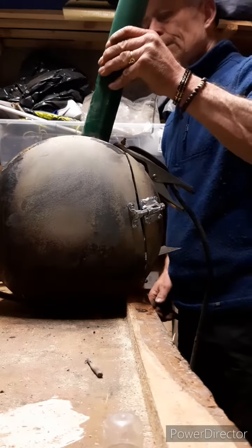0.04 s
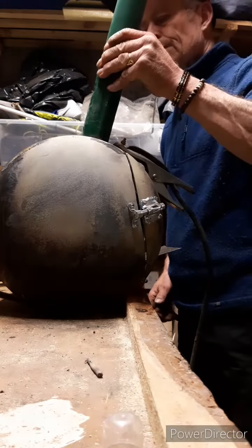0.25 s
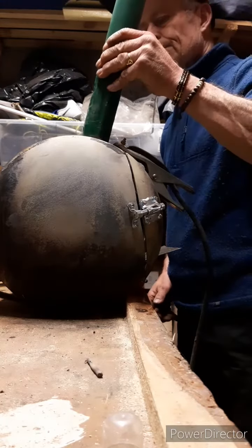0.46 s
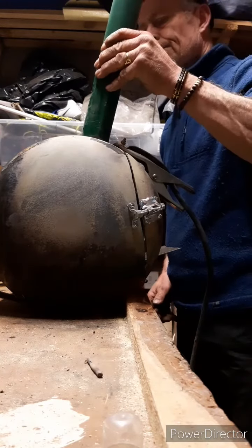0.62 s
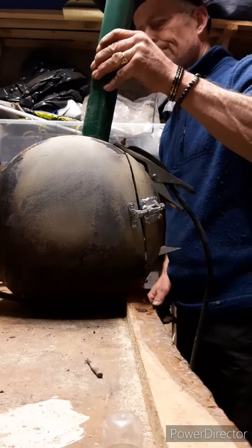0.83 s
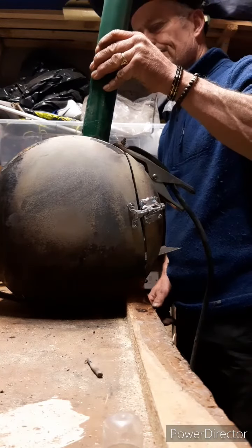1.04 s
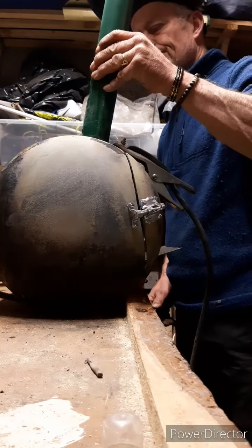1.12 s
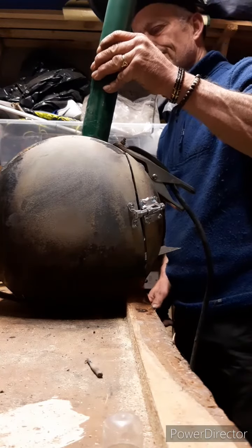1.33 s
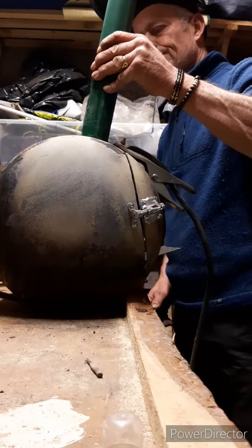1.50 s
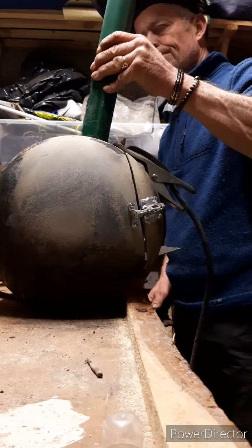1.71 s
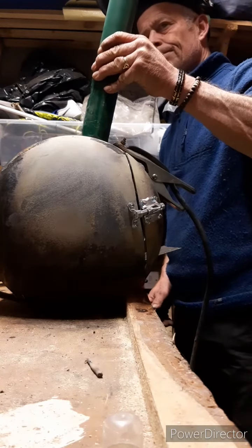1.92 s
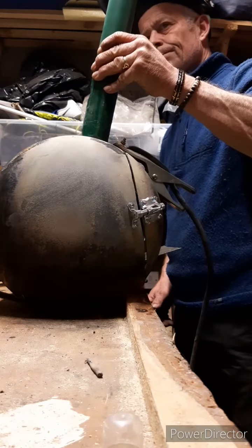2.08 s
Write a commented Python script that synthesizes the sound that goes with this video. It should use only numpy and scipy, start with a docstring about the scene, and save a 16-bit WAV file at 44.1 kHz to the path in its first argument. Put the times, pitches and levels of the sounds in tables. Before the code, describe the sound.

Dull thumps of a rocking gas bottle, then light scrapes and a sharp metal click.

```python
"""Steel tube against a gas bottle

A steel tube is shifted by hand against a large gas bottle lying on a wooden bench in a small workshop.
The bottle rocks: impacts excite its low modes and thud in the bench, and rolling adds a rumble.
Friction makes the tube hiss as it slides; where it catches, scrapes and clicks excite its high modes.
The room reverberates briefly over a low steady drone."""
import sys
import numpy as np
from scipy import signal
from scipy.fft import rfft, irfft
from scipy.io import wavfile

SR = 44100
rng = np.random.default_rng(int(sys.argv[2]) if len(sys.argv) > 2 else 0)


def unload_wav(signal):
    """Save mono or channel-first audio to the path in sys.argv[1] as 16-bit WAV at rate SR, clipped to [-1, 1]."""
    wavfile.write(
        sys.argv[1],
        SR,
        np.round(np.clip(np.atleast_2d(signal).T, -1, 1) * 32767).astype(np.int16),
    )


N = 94815


def amp(db):
    """Amplitude ratio of a level in decibels."""
    return 10 ** (np.asarray(db) / 20)


def curve_at(points, hz):
    """Interpolation on a logarithmic frequency axis."""
    frequency, value = np.transpose(points)
    return np.interp(np.log(hz + 1), np.log(frequency + 1), value)


def unit_rms(x):
    """Normalisation to unit mean power."""
    return x / np.sqrt(np.mean(x ** 2) + 1e-20)


def pan(db):
    """Direction by level difference: two channel gains, the left exceeding the right by db."""
    return amp([[db / 2], [-db / 2]])


def add(mix, start, sound):
    """Superposition: a sound joins the mix at a start time in seconds."""
    part = mix[..., max(round(start * SR), 0):][..., :sound.shape[-1]]
    part += sound[..., :part.shape[-1]]


def convolve(x, response):
    """Linear system: each channel is convolved with an impulse response."""
    return signal.fftconvolve(np.atleast_2d(x), np.atleast_2d(response), axes=1)[:, :N]


def colour(x, spectrum, tilt_db=0, size=2048):
    """Minimum-phase filtering by a spectrum and a tilt per octave; white noise keeps its power."""
    hz = abs(np.fft.fftfreq(size, 1 / SR))
    gain = unit_rms(amp(curve_at(spectrum, hz) + tilt_db * np.log2(1 + hz / 1000)))
    transfer = np.exp(np.conj(signal.hilbert(np.log(gain))))
    return convolve(x, np.fft.ifft(transfer).real)


# Likeness of left and right (frequency [Hz], correlation [-1 to 1])
CORRELATION = [(30, 0.41), (200, 0.99), (450, 0.88), (800, 0.78), (1300, -0.2), (3000, -0.0049)]
def correlate(x):
    """Spatial coherence: long waves arrive nearly alike at two close points, short waves do not."""
    left, other = rfft(x)
    likeness = np.clip(curve_at(CORRELATION, np.fft.rfftfreq(x.shape[1], 1 / SR)), -1, 1)
    right = likeness * left + np.sqrt(1 - likeness ** 2) * other
    return irfft(np.array([left, right]), x.shape[1])


def noise(spectrum):
    """Spectral shaping: white noise becomes steady coloured stereo noise of unit power."""
    shape = amp(curve_at(spectrum, np.fft.rfftfreq(N, 1 / SR)))
    white = rng.standard_normal((2, N))
    return unit_rms(correlate(irfft(rfft(white) * shape, N)))


# Reverberation of the workshop (frequency [Hz], T60 [s])
ROOM_DECAY = [(60, 0.25), (250, 0.8), (1000, 0.5), (3000, 0.34), (7000, 0.25), (15000, 0.23)]
def reverberate(x, wet_db, onset_s=0.0016):
    """Diffuse reverberation: dense reflections follow the direct sound and decay exponentially by band."""
    hz, t, bands = signal.stft(rng.standard_normal((2, SR)), SR, nperseg=256)
    decay = amp(-60 * t / curve_at(ROOM_DECAY, hz)[:, None])
    tail = signal.istft(bands * decay, SR, nperseg=256)[1]
    tail = correlate(tail) * np.minimum(np.arange(tail.shape[1]) / SR / onset_s, 1)
    return x + amp(wet_db) * convolve(x, tail / np.linalg.norm(tail[0]))


# Spectra of the workshop's drone and hiss (frequency [Hz], relative spectral density [dB])
DRONE_SPECTRUM = [(25, -17), (48, -27), (65, -28), (119, -18), (152, -12), (210, -2), (301, -14.5),
                  (393, -14.5), (446, -28), (487, -16.5), (710, -22.5), (860, -20), (1150, -27.5),
                  (1800, -33), (2400, -100)]
HISS_SPECTRUM = [(500, 10), (1500, 3), (2000, 12), (2650, 12.5), (3200, 0), (5500, -0.5), (7500, -6),
                 (8700, -21), (11500, -9), (15000, -14.5)]
# Slow, irregular rises and dips in the low background noise's level (time [s], level change [dB])
BACKGROUND_LEVEL = [(0, 0.5), (0.5, 1.5), (0.649, 0.5), (0.74, -1.5), (0.9, 1.5), (1.2, 1.5), (1.29, -1),
                    (1.42, 2.5), (1.55, -0.5), (1.66, 3), (1.93, -1.5), (2.1, 0.5)]
def background(drone_db=-49, hiss_db=-65):
    """Ambient noise: a low band whose level rises and dips a little, and a faint steady hiss."""
    change_db = np.interp(np.arange(N) / SR, *np.transpose(BACKGROUND_LEVEL))
    low_noise = amp(drone_db + change_db) * noise(DRONE_SPECTRUM) * pan(-1)
    hiss = amp(hiss_db) * noise(HISS_SPECTRUM) * pan(-6.5)
    return low_noise + hiss


# Friction spectra under light and firm pressure (frequency [Hz], relative spectral density [dB])
LIGHT_FRICTION = [(300, -1), (1500, -2.5), (2600, -9), (3600, -17.5), (5600, -0.5), (7200, -9.5),
                  (8800, -15.5), (10800, -8), (12600, 3), (14000, -5), (15500, -11)]
FIRM_FRICTION = [(300, -5.5), (1500, -5), (2500, 5), (3800, -7), (6000, -2.5), (10800, -2.5), (12500, 1.5),
                 (15500, -5)]
# Slides of the tube (start [s], end [s], rise [s], release [s], relative level [dB], pressure [0 to 1])
TUBE_SLIDES = [(-0.03, 0.184, .02, 0.088, -49.5, 0.94), (0.46, 0.813, 0.26, 1, -52, 0.14)]
def tube_slides(sag_db_per_s=21):
    """Sliding friction: a smooth hiss, thin under a light touch and broad under pressure."""
    t, out = np.arange(N) / SR, np.zeros((2, N))
    for start, end, rise, release, db, pressure in TUBE_SLIDES:
        envelope = np.clip((t - start) / rise, 0, 1) * np.exp(-np.maximum(t - end, 0) / release)
        hiss = pressure * noise(FIRM_FRICTION) + (1 - pressure) * noise(LIGHT_FRICTION)
        out += envelope * amp(db - sag_db_per_s * (t - start)) * hiss
    return out * pan(-1.5)


BOTTLE_PAN_DB = -3.2
# Rumble of the bench (frequency [Hz], relative spectral density [dB])
RUMBLE_SPECTRUM = [(40, -26), (57, -5), (76, -8), (100, 0.5), (128, 4.5), (170, -5.5), (235, -3),
                   (340, -13.5), (1500, -58.5)]
# Rolls of the bottle (start [s], end [s], level [dB])
BOTTLE_ROLLS = [(0.186, 0.39, -40.5), (0.955, 1.078, -49.5)]
def bottle_rolls(rise_s=0.013, fade_s=0.085):
    """Rolling noise: the moving contact under the bottle drives a low rumble in the bench."""
    t, envelope = np.arange(N) / SR, np.zeros(N)
    for start, end, db in BOTTLE_ROLLS:
        onset = np.clip((t - start) / rise_s, 0, 1)
        envelope += amp(db) * onset * np.exp(-np.maximum(t - end, 0) / fade_s)
    return envelope * noise(RUMBLE_SPECTRUM) * pan(BOTTLE_PAN_DB)


def micro_slips(per_s=6000, spread_db=2.5):
    """Stick-slip friction: a dense random train of impulses of uneven size."""
    size = amp(spread_db * np.minimum(rng.exponential(1, N), 4))
    sign = np.sign(rng.standard_normal(N))
    slipping = rng.random(N) < per_s / SR
    return unit_rms(size * sign * slipping)


# Modes of the tube (frequency [Hz], relative level [dB], left minus right [dB])
TUBE_MODES = [(1940, -5, -6), (2573, -2, -3), (2775, 2, -7), (2825, -4, -4), (4330, -3, -2), (5450, 0, -5),
              (5655, -4, -4), (6187, -4, -10), (6318, 1, -9), (6950, -7, 5), (7310, -7, -2), (7650, -8, 0),
              (8820, -3.5, 11), (11410, -4, -6), (14230, -9, -3)]
def tube_ring(force, tilt_db, reference_hz=5000, reference_t60_s=0.16, linewidth_hz=11, spread_db=1.5):
    """Modal resonance: each mode stores contact energy and loses it by damping; close pairs beat."""
    t, out = np.arange(len(force)) / SR, np.zeros((2, len(force)))
    total = np.sqrt(sum(amp(db) ** 2 for _, db, _ in TUBE_MODES))
    for hz, db, pan_db in TUBE_MODES:
        t60 = reference_t60_s * (reference_hz / hz) ** 0.3  # higher modes die sooner
        retained = amp(-60 / (t60 * SR)) ** 2  # share of energy left after one sample
        energy = signal.lfilter([1 - retained], [1, -retained], force ** 2)
        drift = np.cumsum(rng.standard_normal((2, len(t))), 1) * np.sqrt(2 * np.pi * linewidth_hz / SR)
        mode_db = db + spread_db * rng.standard_normal() + tilt_db * np.log2(hz / reference_hz)
        gain = amp(mode_db) * unit_rms(pan(pan_db)) / total
        phase = 2 * np.pi * (hz * t + rng.random((2, 1))) + drift
        out += gain * np.sqrt(2 * energy) * np.sin(phase)
    return out


# Broad response of steel on steel, and narrow resonances of the rim (frequency [Hz], relative gain [dB])
CONTACT_SPECTRUM = [(100, -10.5), (540, 5.5), (850, 10), (1200, -1.5), (2500, 6.5), (3500, 3), (5600, 1),
                    (8000, 1), (10000, -2), (14000, 0), (16000, -4.5)]
SQUEAK_SPECTRUM = [(500, -39), (2450, -26), (2750, -9), (3100, -42), (5100, -2), (5680, 2.5), (6300, -3),
                   (8000, -13), (16000, -48)]
# Catches of the tube (time [s], relative level [dB], rise [s], fade [s], tilt [dB/octave],
# ring gain [dB], squeak gain [dB])
TUBE_SCRAPES = [(0.197, -40.5, 0.002, 0.028, -7, -32, -7.5), (0.369, -52, 0.012, 0.036, -10, -32, -10),
                (0.945, -43.5, 0.018, 0.014, -1.2, -11, -4), (1.009, -51, 0.0071, 0.031, -1.5, -7, -8),
                (1.099, -41.5, 0.0024, 0.0078, -6.5, -5, -14.5),
                (1.140, -53.5, 0.0046, 0.02, -2.5, -12, -8.5), (1.231, -47, 0.01, 0.016, -1, -4, -1.5),
                (1.588, -52.5, 0.003, 0.031, -3.5, 1, -7), (1.611, -38, 0.015, 0.0085, -0.5, 2.5, -5.5),
                (1.625, -45.5, 0.011, 0.0053, -16, -8, -11), (1.915, -51, 0.016, 0.008, -2, -5, -2.5)]
def tube_scrapes():
    """Frictional excitation: the dragging rim rasps in short bursts, squeaks and rings the tube."""
    t, friction, ring = np.arange(SR // 5) / SR, np.zeros((2, N)), np.zeros((2, N))
    slips = np.array([micro_slips(), micro_slips()])
    for start, db, rise, fade, tilt_db, ring_db, squeak_db in TUBE_SCRAPES:
        force = amp(db) * np.minimum(t / rise, 1) * np.exp(-np.maximum(t - rise, 0) / fade)
        rasp = force * np.roll(slips, -round(start * SR), axis=1)[:, :len(t)]
        squeak = colour(force * rng.standard_normal((2, len(t))), SQUEAK_SPECTRUM)
        add(friction, start, colour(rasp, CONTACT_SPECTRUM, tilt_db) + amp(squeak_db) * squeak)
        add(ring, start, amp(ring_db) * tube_ring(force, tilt_db))
    return reverberate(friction, wet_db=2) * pan(-4) + ring


# Modes of the bottle on the bench (frequency [Hz], relative level [dB], T60 [s])
BOTTLE_MODES = [(58.1, -16.5, 0.6), (106.4, -28, 0.4), (131.8, 0.5, 0.18), (130.6, -24, 0.6),
                (181.3, -12.5, 0.23), (231.2, -3.5, 0.27), (317.3, -13, 0.4), (486, -12, 0.32),
                (600, -21, 0.19), (650, -14, 0.16), (829, -17.5, 0.27)]
# Thud of the bench (frequency [Hz], relative gain [dB])
THUD_SPECTRUM = [(40, -34), (57, -12), (82, -26), (125, -9), (170, 3), (310, -1.5), (700, -8), (1300, -11),
                 (3000, -57)]
# Blows on the bench (time [s], relative level [dB], contact time [ms], T60 factor [ratio])
BOTTLE_THUMPS = [(0.1995, -32, 1.1, 0.16), (0.2076, -25.5, 0.74, 0.68), (0.2205, -27, 4.4, 0.65),
                 (0.284, -40, 1.2, 0.91), (0.339, -22.5, 7.1, 1.2), (0.3629, -31, 8, 1.2),
                 (0.3861, -26, 10.2, 0.69), (0.4027, -29, 3.9, 0.57), (0.959, -31.5, 2.8, 1.07),
                 (1.02, -33.5, 1.6, 0.44), (1.182, -47.5, 2, 0.3), (1.359, -42, 4.6, 0.62)]
def bottle_thumps(thud_db=-7, thud_t60_s=0.24):
    """Impact excitation of bottle and bench: longer contact sounds duller, a firm grip damps the ring."""
    t, out = np.arange(SR) / SR, np.zeros((1, N))
    for start, db, contact_ms, t60_factor in BOTTLE_THUMPS:
        pulse_time = t * 1000 / (contact_ms / 4)  # the force peaks a quarter into the contact
        force = pulse_time * np.exp(-pulse_time)
        ring = sum(amp(mode_db - 60 * t / (t60 * t60_factor)) * np.sin(2 * np.pi * hz * t)
                   for hz, mode_db, t60 in BOTTLE_MODES)
        bench_noise = colour(rng.standard_normal(SR), THUD_SPECTRUM)[0, :SR]
        thud = amp(thud_db - 60 * t / thud_t60_s) * bench_noise
        add(out, start, amp(db) * convolve(force / force.sum(), ring + thud))
    return reverberate(out, wet_db=-10) * pan(BOTTLE_PAN_DB)


# The tube snaps into a new seat (time [s], relative energy level [dB])
TUBE_CLICKS = [(1.3012, -13), (1.3043, -15), (1.3158, -25.5)]
def tube_clicks(fade_s=0.0052, tilt_db=0.8, ring_db=5.5):
    """Hard impact: a brief chatter of steel on steel gives a broadband tick and rings the tube."""
    t, ticks, ring = np.arange(SR // 3) / SR, np.zeros((2, N)), np.zeros((2, N))
    pulse = np.exp(-t / fade_s)
    for start, db in TUBE_CLICKS:
        force = amp(db) * pulse / np.linalg.norm(pulse)
        chatter = force * rng.standard_normal((2, len(t)))
        add(ticks, start, colour(chatter, CONTACT_SPECTRUM, tilt_db))
        add(ring, start, tube_ring(force, tilt_db))
    return reverberate(ticks, wet_db=5) * pan(-1) + amp(ring_db) * ring


def scene(catch_db=-7.5):
    """Superposition: the sound pressures of bottle, tube and workshop add."""
    bottle = bottle_thumps() + bottle_rolls()
    tube = amp(catch_db) * (tube_scrapes() + tube_clicks()) + tube_slides()
    return bottle + tube + background()


def record(dry, low_hz=55, high_hz=15450):
    """Band limiting: a high-pass filter cuts the deep bass, a steep low-pass the highest treble."""
    highpass = signal.butter(4, low_hz, "highpass", fs=SR, output="sos")
    lowpass = signal.firwin(511, high_hz, window=("kaiser", 9), fs=SR)
    return signal.oaconvolve(signal.sosfilt(highpass, dry), lowpass[None], "same")


dry = scene()
out = record(dry)
unload_wav(out)
```